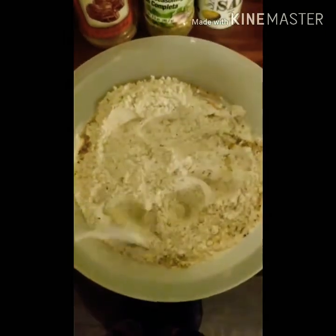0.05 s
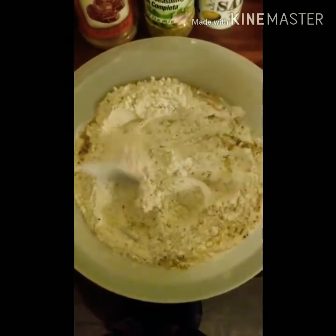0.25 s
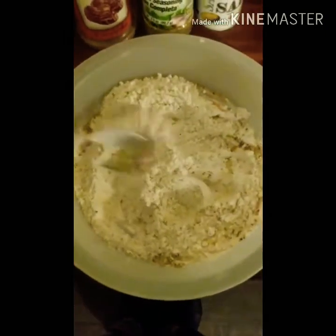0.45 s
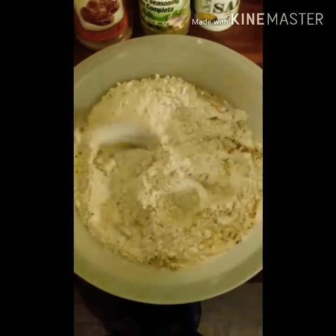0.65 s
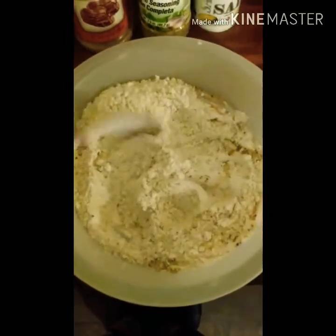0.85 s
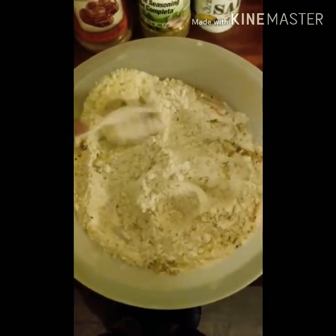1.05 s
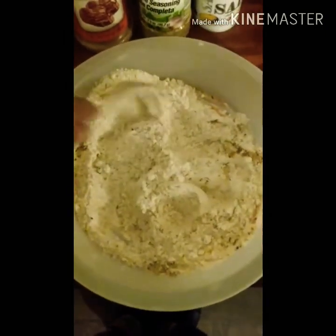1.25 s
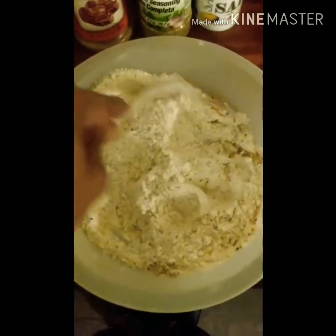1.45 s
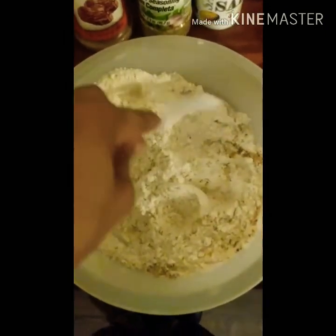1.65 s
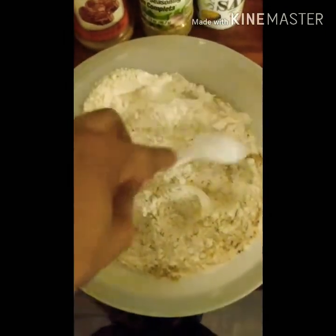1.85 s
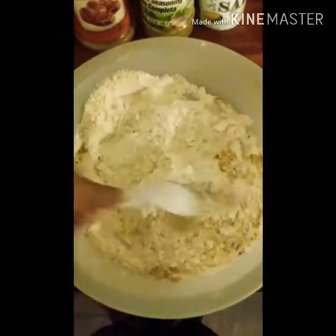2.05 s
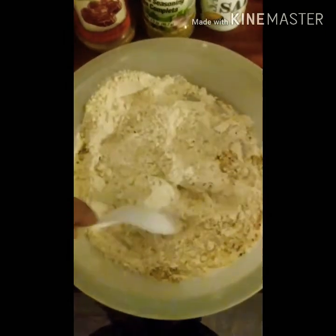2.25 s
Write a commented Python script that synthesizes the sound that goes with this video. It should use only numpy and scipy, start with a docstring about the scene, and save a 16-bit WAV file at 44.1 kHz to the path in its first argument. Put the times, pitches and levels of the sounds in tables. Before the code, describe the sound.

Close up in a small kitchen, plastic tines rasp irregularly on a bowl of dry flour, snapping and pinging, with powdery swishes between strokes, one short bowl groan midway, and quiet appliance hum underneath.

```python
"""A plastic fork is worked through dry flour in a shallow bowl, close by, in a small kitchen.
The tines rasp on the bowl in short gritty scrapes, flicks and brief pings, all friction grains and decaying tones.
Flour grains swish and fizz through filters; knocks and thuds are decaying sines.
The bowl gives one low rubbing groan of random slips and a gliding sine; a faint thin hiss passes near the start.
An appliance hums underneath."""
import sys
import numpy as np
from scipy import signal
from scipy.fft import rfft, irfft, next_fast_len
from scipy.io import wavfile
from scipy.ndimage import uniform_filter1d

SR = 44100
rng = np.random.default_rng(int(sys.argv[2]) if len(sys.argv) > 2 else 0)


def waveform_to_disk(signal):
    """Save audio, clipped to [-1, 1], as 16-bit WAV at the path in sys.argv[1]."""
    frames = np.transpose(np.atleast_2d(signal))
    scaled = np.clip(frames, -1, 1) * 32767
    samples = np.round(scaled).astype(np.int16)
    wavfile.write(sys.argv[1], SR, samples)


N = 101429
T = np.arange(N) / SR

# powdery treble colour of flour and scrapes: [freq_hz, colour_db]
FIZZ = [(500, -56), (4000, -24), (7000, -21), (8800, 4), (10500, 5), (12500, 5.5), (14500, 1), (15350, 6.5),
        (15900, -26.5)]
GRAINS_PER_S, GRAIN_SPREAD_DB = 2200, 3  # flour and faint hiss


def from_db(db):
    """Decibels to amplitude gain."""
    return 10 ** (np.asarray(db) / 20)


def rms_one(x):
    """Scale to unit rms."""
    return x / np.sqrt(np.mean(x ** 2) + 1e-20)


def curve(points):
    """Straight-line curve over time through (time, value) points."""
    return np.interp(T, *np.transpose(points))


def colour(x, points):
    """Causal minimum-phase filter whose gain follows (Hz, dB) points."""
    size = 2 * next_fast_len(N)
    hz, db = np.transpose(points)
    bins_hz = np.fft.rfftfreq(size, 1 / SR)
    gain_db = np.interp(np.log(bins_hz + 1), np.log(hz), db)
    cepstrum = irfft(np.log(from_db(gain_db)))
    # fold the cepstrum onto positive time: minimum phase
    cepstrum[1:size // 2] *= 2
    cepstrum[size // 2 + 1:] = 0
    return irfft(rfft(x, size) * np.exp(rfft(cepstrum)))[..., :N]


def resonator(hz, width_hz):
    """Two-pole filter coefficients with unit gain at the resonance."""
    r = np.exp(-np.pi * width_hz / SR)
    zeros = np.array([1, 0, -1]) * (1 - r * r) / 2
    poles = [1, -2 * r * np.cos(2 * np.pi * hz / SR), r * r]
    return zeros, poles


def resonance(x, hz, width_hz):
    """Fixed two-pole resonance."""
    return signal.lfilter(*resonator(hz, width_hz), x)


def gliding_resonance(x, centre_hz, width_hz):
    """Two-pole resonance whose centre follows a curve, block by block."""
    out, state, block = np.zeros_like(x), np.zeros((2, 2)), 128
    for i in range(0, N, block):
        zeros, poles = resonator(centre_hz[i], width_hz)
        out[:, i:i + block], state = signal.lfilter(zeros, poles, x[:, i:i + block], zi=state)
    return out


def wander(hz):
    """Low-passed noise: smooth random motion with unit rms."""
    lowpass = signal.butter(2, hz, fs=SR, output="sos")
    return rms_one(signal.sosfilt(lowpass, rng.standard_normal(N)))


def grains(per_s, spread_db):
    """Random clicks of uneven size and sign, at unit rms."""
    sizes = from_db(spread_db * np.minimum(rng.exponential(1, N), 4))
    signs = rng.choice([-1, 1], N)
    return rms_one(sizes * signs * (rng.random(N) < per_s / SR))


def grit(per_s, spread_db):
    """Grains at two microphones: the shared part reaches the left ever earlier as the fork travels."""
    travel_start_s, left_lead_s_per_s = 0.3, 0.00013
    shared_power = 0.22
    shared = grains(per_s, spread_db)
    lead_s = left_lead_s_per_s * np.maximum(T - travel_start_s, 0)
    right_index = np.clip(np.round((T - lead_s) * SR).astype(int), 0, N - 1)
    pair = np.array([shared, shared[right_index]])
    separate = np.array([grains(per_s, spread_db) for _ in pair])
    return np.sqrt(shared_power) * pair + np.sqrt(1 - shared_power) * separate


def pan(left_right_db):
    """Left and right gains at constant power."""
    return rms_one(from_db(np.array([[left_right_db], [-left_right_db]]) / 2))


def through_fork(x, spectrum):
    """Colour friction by a spectrum and the fork's ring, normalised to unit impulse-response energy."""
    # the fork's own ring: [freq_hz, width_hz, gain]
    fork_modes = [(2945, 210, 0.81), (9960, 130, 0.13), (14000, 210, 1)]

    def body(v):
        ring = sum(gain * resonance(v, hz, width_hz) for hz, width_hz, gain in fork_modes)
        return colour(v + ring, spectrum)
    return body(x) / np.sqrt(np.sum(body(signal.unit_impulse(N)) ** 2))


def tines():
    """Scrapes swell, chatter and stop short; flicks snap and decay. Both excite bowl, rasp and fizz."""
    # tines scrape the bowl: [start_s, rise_s, hold_s, bowl_db, rasp_db, fizz_db, left_right_db]
    scrapes = [(.000, 0.00057, 0.031, -89, -78.5, -62.5, -5), (0.222, 0.0056, 0.023, -55, -55.5, -48.5, 3),
               (0.248, 0.003, 0.033, -72, -62, -54.5, 13), (.284, .011, .0028, -42, -28.5, -24.5, -6),
               (0.438, 0.039, 0.04, -86, -64.5, -54.5, -8.5), (0.633, 0.051, 0.034, -82, -96, -54, -32),
               (0.734, 0.005, 0.011, -68, -52, -44.5, -7), (0.881, 0.048, 0.03, -82, -60, -52, -13),
               (1.186, 0.0063, 0.0128, -50.5, -46.5, -37.5, -3),
               (1.407, 0.0048, 0.018, -49, -53.5, -47.5, -4), (1.43, 0.0039, 0.0038, -78, -51, -40, -4),
               (1.597, 0.011, 0.033, -42.5, -45.5, -48, 0.5), (1.635, 0.0081, 0.027, -45, -45, -47, -2.5),
               (1.777, 0.033, 0.0091, -50, -48.5, -54.5, -3), (1.825, 0.0082, 0.00097, -36.5, -58, -46, -6),
               (1.834, 0.0039, 0.019, -47.5, -38, -38.5, -1), (2.021, 0.021, 0.0052, -61.5, -52, -42.5, 0),
               (2.202, 0.019, 0.0038, -78, -64, -50, 4)]
    # a tine flicks free: [start_s, bowl_db, rasp_db, fizz_db, left_right_db]
    flicks = [(0.2312, -34, -31, -29, -4.5), (0.537, -54.5, -70.5, -67.5, 9), (0.9356, -59, -38, -36, -2),
              (1.111, -72, -39, -32, -1.5), (1.137, -71, -51, -34.5, -6), (1.148, -51.5, -41, -37, -7),
              (1.4176, -34.5, -44.5, -51, 9), (1.607, -27.5, -39, -37.5, -8), (1.615, -33, -56, -48, -23),
              (1.6335, -43, -50, -48, 15), (1.994, -68, -75, -47, 0), (2.046, -64, -58, -45, -27)]
    # bowl colour under friction: [freq_hz, colour_db]
    bowl_colour = [(200, -47.5), (500, -33), (730, -11), (900, -7), (1090, -6.5), (1350, -3.5), (1620, 3),
                   (2100, -6), (3200, -8.5), (16000, -61.5)]
    # gritty rasp colour: [freq_hz, colour_db]
    rasp_colour = [(200, -45.5), (800, -35.5), (1400, -32.5), (2000, -3.5), (2450, 0), (3000, -8.5),
                   (3600, -3.5), (4300, -4.5), (5500, -10), (7500, -6), (10000, -7), (16000, -26)]
    release_s, flick_decay_s = 0.00085, 0.0013  # 1/e times
    slips_per_s, slip_spread_db = 7000, 4.5
    chatter_hz, chatter_db = 175, 1

    # the tines catch and let go unevenly
    chatter = rms_one(from_db(chatter_db * wander(chatter_hz)))
    out = 0
    for k, spectrum in enumerate((bowl_colour, rasp_colour, FIZZ)):
        power = 0
        for start_s, rise_s, hold_s, *levels_db, left_right_db in scrapes:
            swell = np.clip((T - start_s) / rise_s, 0, 1) ** 2
            release = np.exp(-np.maximum(T - start_s - rise_s - hold_s, 0) / release_s)
            level = from_db(levels_db[k]) * pan(left_right_db)
            power = power + (level * swell * release * chatter) ** 2
        for start_s, *levels_db, left_right_db in flicks:
            snap = (T >= start_s) * np.exp(-np.abs(T - start_s) / flick_decay_s)
            power = power + (from_db(levels_db[k]) * snap * pan(left_right_db)) ** 2
        friction = np.sqrt(power) * grit(slips_per_s, slip_spread_db)
        out = out + through_fork(friction, spectrum)
    return out


def pings():
    """A caught tine swells into a tone, pitched by where it is caught, and the flour damps it at once."""
    # singing tines: [start_s, pitch_hz, swell_s, peak_db, left_right_db]
    ping_events = [(.2311, 12700, 0.00065, -19.5, -15), (.293, 14500, 0.0013, -21.5, -9),
                   (0.2962, 2950, 0.0012, -30.5, -2), (1.196, 9500, 0.0016, -39, -11),
                   (1.433, 8900, 0.0014, -39.5, -12)]
    out = 0
    for start_s, hz, swell_s, db, left_right_db in ping_events:
        age_s = np.maximum(T - start_s, 0)
        envelope = age_s / swell_s * np.exp(1 - age_s / swell_s)  # peaks at 1
        out = out + from_db(db) * pan(left_right_db) * envelope * np.sin(2 * np.pi * hz * age_s)
    return out


def knocks():
    """Bumps set the flour-damped bowl ringing briefly: decaying sine modes, high-passed."""
    # bumps of the bowl: [start_s, level_db]
    bumps = [(0.2313, -41.5), (1.8374, -25.5)]
    # bowl modes: [freq_hz, level_db, t60_s]
    bowl_modes = [(586, -33, 0.12), (735, -10.5, 0.022), (850, -3, 0.01), (1294, -5.5, 0.012),
                  (1546, -15, 0.04)]
    out = 0
    for start_s, db in bumps:
        age_s = np.maximum(T - start_s, 0)
        for hz, mode_db, t60_s in bowl_modes:
            out = out + from_db(db + mode_db - 60 * age_s / t60_s) * np.sin(2 * np.pi * hz * age_s)
    return signal.sosfilt(signal.butter(3, 500, "high", fs=SR, output="sos"), out)


def groan():
    """The bowl sticks and slips: a gliding sine core, roughened by uneven slips in low resonances."""
    # groan loudness: [time_s, level_db]
    groan_level = [(0.926, -105), (0.939, -61.5), (0.967, -68.5), (0.991, -54), (1.051, -56.5),
                   (1.09, -69.5), (1.14, -74.5), (1.18, -87)]
    # groan resonances: [freq_hz, width_hz, level_db]
    groan_modes = [(543, 34.5, 1.5), (622, 29, -2), (704, 53, -9.5)]
    # pitch of the core: [time_s, pitch_hz]
    groan_pitch = [(.94, 518), (.985, 570.5), (1.01, 531.7), (1.06, 560.4), (1.11, 607.5)]
    low_hz, high_hz = 468, 960
    core_gain, wobble_db = 0.73, 5

    def even_out(x):
        return x / np.sqrt(uniform_filter1d(x ** 2, size=1200) + 1e-12)  # size in samples

    slips = grains(per_s=490, spread_db=2.5)
    rough = 0
    for hz, width_hz, db in groan_modes:
        narrow = resonance(slips, hz, width_hz)
        rough = rough + from_db(db) * resonance(narrow, hz, 2 * width_hz)
    band = signal.butter(4, (low_hz, high_hz), "band", fs=SR, output="sos")
    rough = even_out(signal.sosfilt(band, rough))
    phase = 2 * np.pi * np.cumsum(curve(groan_pitch)) / SR
    core = np.sin(phase) * from_db(wobble_db * wander(hz=70.6))
    tone = even_out(rough + core_gain * core)
    sounding = (T > groan_level[0][0]) * (T < groan_level[-1][0])
    return tone * from_db(curve(groan_level)) * sounding


def ease_in_out(start_s, length_s):
    """Envelope that eases in, holds and eases out."""
    edge_s = 0.045
    return np.clip(np.minimum(T - start_s, start_s + length_s - T) / edge_s, 0, 1)


def flour():
    """Fine grains slide past the fork: a swish with a shifting hollow resonance, and a powdery fizz."""
    # pushes, levels ahead of resonance and clumping: [start_s, length_s, swish_db, fizz_db]
    pushes = [(0.276, 0.17, -67.5, -69), (0.359, 0.27, -71, -72.5), (0.654, 0.15, -66.5, -64.5),
              (0.783, 0.13, -66.5, -72.5), (0.914, 0.19, -59, -58.5), (1.114, 0.13, -49.5, -62),
              (1.235, 0.54, -61, -88), (1.328, 0.19, -54, -60), (1.473, 0.12, -54, -62),
              (1.627, 0.14, -54, -58.5), (1.953, 0.12, -58.5, -82), (2.108, 0.13, -52, -69),
              (2.164, 0.17, -52.5, -58.5)]
    # swish colour: [freq_hz, colour_db]
    swish_colour = [(300, -36.5), (1050, -29), (1350, -11.5), (1800, -1.5), (2300, -6.5), (3000, -7),
                    (3600, -9), (4500, -10.5), (6000, -15.5), (9000, -11), (16000, -40)]
    # hollow resonance, shifting with fork depth: [time_s, centre_hz]
    swish_peak = [(.6, 1910), (1.1, 1970), (1.2, 1760), (1.33, 1460), (1.43, 1760), (1.53, 2000),
                  (1.7, 1840), (2.15, 1620), (2.3, 1680)]
    peak_width_hz, peak_gain, peak_wobble_hz = 133, 1.59, 125
    clump_hz, clump_db = 69, 1.37

    layers = []
    for k, spectrum in enumerate((swish_colour, FIZZ)):
        power = 0
        for start_s, length_s, *levels_db in pushes:
            power = power + (from_db(levels_db[k]) * ease_in_out(start_s, length_s)) ** 2
        friction = np.sqrt(power) * grit(GRAINS_PER_S, GRAIN_SPREAD_DB)
        layers.append(through_fork(friction, spectrum))
    swish, fizz = layers
    centre_hz = curve(swish_peak) + peak_wobble_hz * wander(hz=15)
    hollow = gliding_resonance(swish, centre_hz, peak_width_hz)
    swish = from_db(-3.5) * (swish + peak_gain * hollow)
    # the flour gives way in clumps
    clumps = rms_one(from_db(clump_db * wander(clump_hz)))
    return (swish + fizz) * pan(-2.5) * clumps


def faint_hiss():
    """A faint, thin, hollow hiss in a few separate narrow bands, near the start."""
    # hiss bands: [freq_hz, width_hz, level_db]
    hiss_bands = [(1710, 270, -78), (2720, 370, -75), (4240, 260, -79), (4850, 240, -81.5),
                  (10260, 500, -74.5)]
    clicks = grit(GRAINS_PER_S, GRAIN_SPREAD_DB)
    out = 0
    for hz, width_hz, db in hiss_bands:
        band = resonance(resonance(clicks, hz, width_hz), hz, width_hz)
        out = out + from_db(db) * rms_one(band)
    return ease_in_out(start_s=0.03, length_s=0.2) * out


def thuds():
    """Soft low bumps of the bowl on the table: decaying sines."""
    # bumps on the table: [start_s, pitch_hz, level_db, t60_s]
    table_bumps = [(0.23, 132, -50.5, 0.13), (0.295, 112, -56, 0.2), (0.686, 239, -59, 0.125),
                   (2.008, 146, -57.5, 0.24)]
    out = 0
    for start_s, hz, db, t60_s in table_bumps:
        age_s = np.maximum(T - start_s, 0)
        out = out + from_db(db - 60 * age_s / t60_s) * np.sin(2 * np.pi * hz * age_s)
    return out


def kitchen(x):
    """A diffuse noise tail, unrelated left and right, with a gain and decay for each band."""
    # room bands: [low_hz, high_hz, gain_db, t60_s]
    room_bands = [(324, 1300, -4.5, 0.23), (1140, 7000, -10.5, 0.37), (4540, 17000, -10, 0.11),
                  (7440, 19000, -26.5, 0.45)]
    age_s, response = T[:SR // 2], 0
    for low_hz, high_hz, db, t60_s in room_bands:
        tail = rng.standard_normal((2, len(age_s))) * from_db(-60 * age_s / t60_s)
        tail = tail * (age_s > 0.003)  # silent before the first reflections
        tail = tail / np.sqrt(np.sum(tail ** 2) / 2)
        band = signal.butter(2, [low_hz, high_hz], "band", fs=SR, output="sos")
        response = response + from_db(db) * signal.sosfilt(band, tail)
    return signal.fftconvolve(x, response, axes=1)[:, :N]


def background():
    """An appliance hums as a sine of wavering level over faint room rumble of coloured noise."""
    # rumble colour: [freq_hz, colour_db]
    floor_colour = [(20, -22.5), (45, 7), (80, -5.5), (100, -14.5), (140, 5.5), (190, -6), (250, -8),
                    (330, -14), (500, -13.5), (1000, -35), (2000, -15.5), (6000, -44), (16000, -18.5)]
    hum_hz, hum_db, floor_db = 58.8, -68.5, -70.5
    air = rng.standard_normal(N) + 0.34 * rng.standard_normal((2, N))  # shared + separate
    hum = np.sin(2 * np.pi * hum_hz * T) * from_db(2.16 * wander(hz=24.6))
    return from_db(floor_db) * rms_one(colour(air, floor_colour)) + from_db(hum_db) * rms_one(hum)


def scene():
    """Fork, flour and bowl in the kitchen; pings, thuds and background get no room tail."""
    # the two microphones hear the bowl differently: [freq_hz, left_right_db]
    mic_balance = [(200, 1.5), (700, -5), (1300, -7), (2400, 2.5), (4400, 2.5), (8100, -1.5), (15000, 4)]
    # room share as the fork moves about the bowl: [time_s, send_db]
    room_send = [(.23, 5), (.30, -2), (.8, 3), (1.2, 1.5), (1.85, 1), (2.3, 3)]
    near = tines() + knocks() + groan() + flour() + faint_hiss()
    left, right = near + pings()
    left = colour(left, [(hz, db / 2) for hz, db in mic_balance])
    right = colour(right, [(hz, -db / 2) for hz, db in mic_balance])
    direct = np.array([left, right])
    return direct + kitchen(near * from_db(curve(room_send))) + thuds() + background()


def record(dry):
    """A steep low-pass, 60 dB down from 16.7 kHz upward."""
    return signal.sosfilt(signal.cheby2(16, 60, 16700, fs=SR, output="sos"), dry)


dry = scene()
out = record(dry)
waveform_to_disk(out)
```